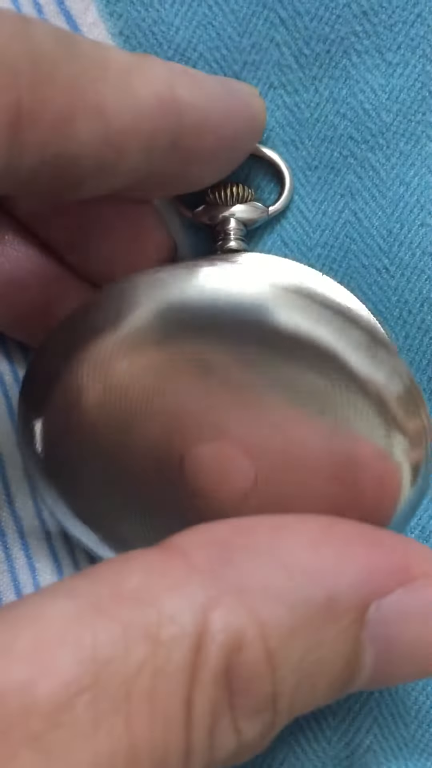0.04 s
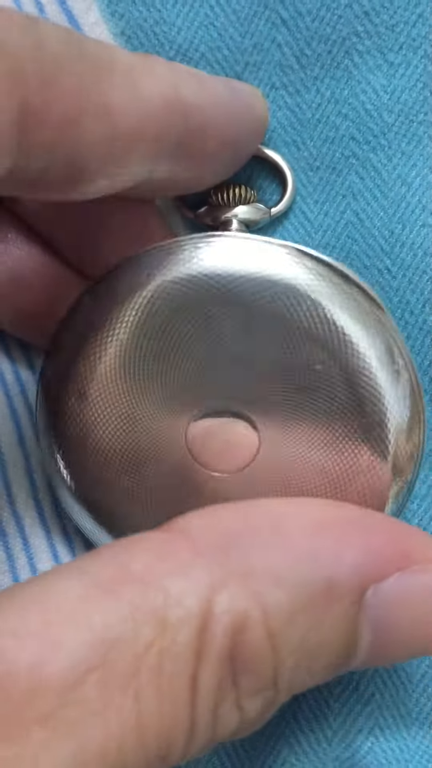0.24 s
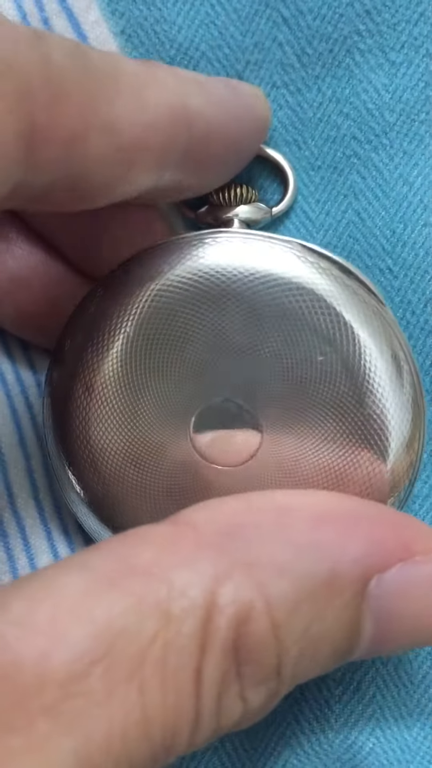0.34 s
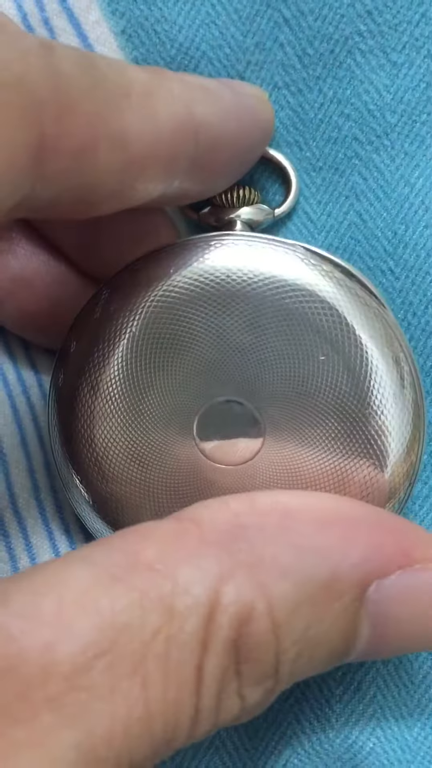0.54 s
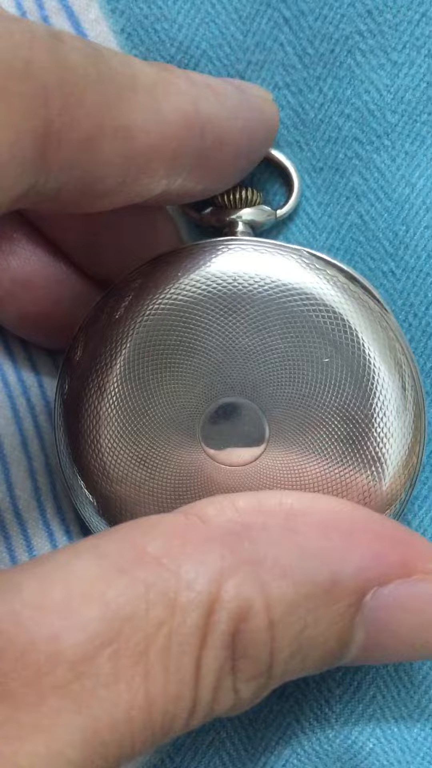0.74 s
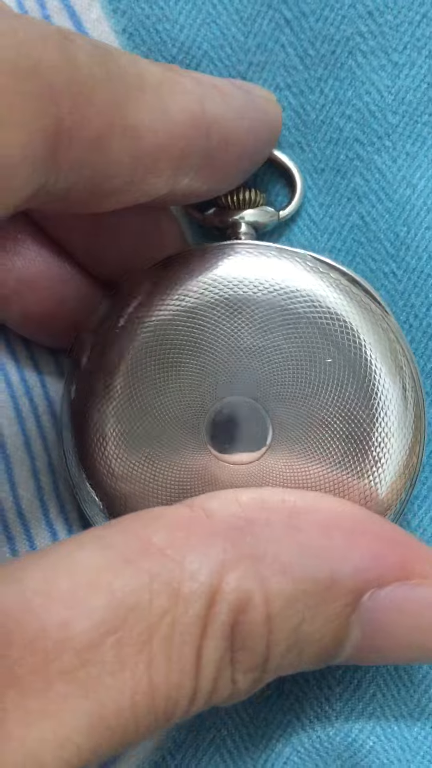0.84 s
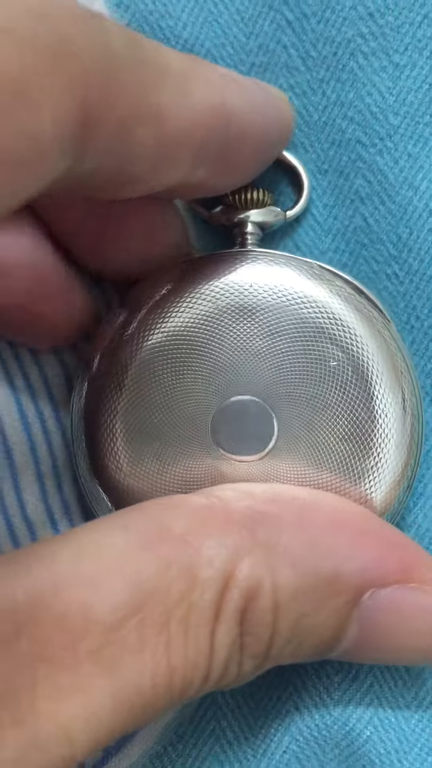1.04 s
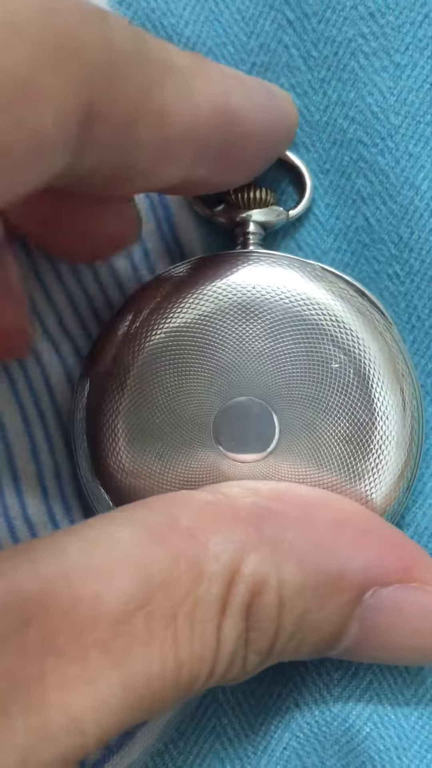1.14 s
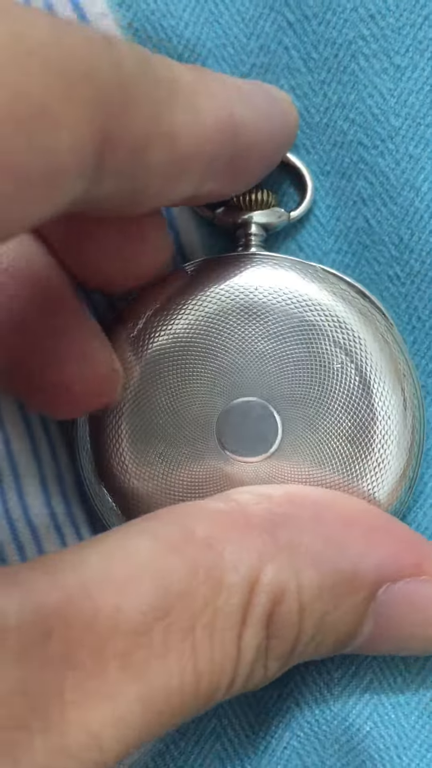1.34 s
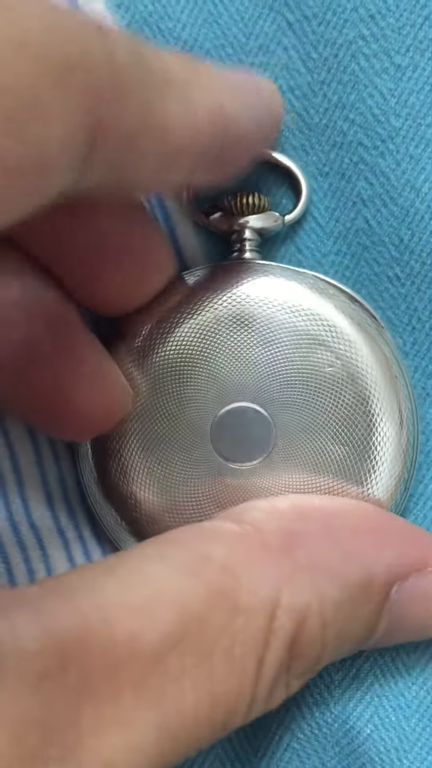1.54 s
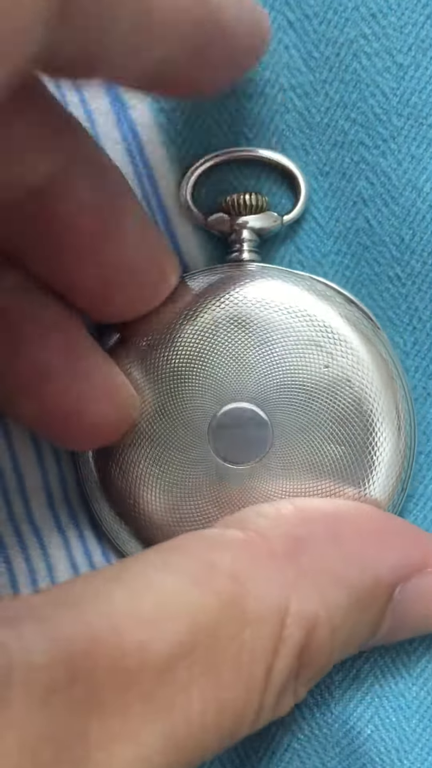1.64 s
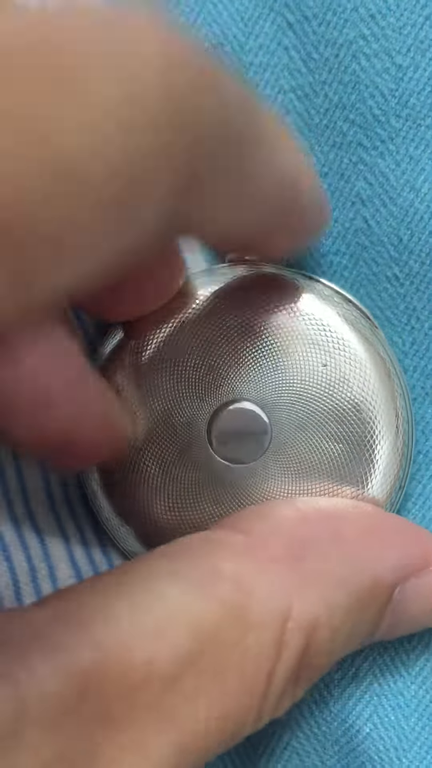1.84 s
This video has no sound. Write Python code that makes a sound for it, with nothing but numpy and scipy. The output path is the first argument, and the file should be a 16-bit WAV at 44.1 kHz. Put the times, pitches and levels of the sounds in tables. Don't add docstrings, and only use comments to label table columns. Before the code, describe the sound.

A pocket watch's metal back snaps shut with one sharp, bright click, then faint finger taps.

```python
import sys
import numpy as np
from scipy import signal
from scipy.fft import rfft, irfft
from scipy.io import wavfile

SR = 44100
rng = np.random.default_rng(int(sys.argv[2]) if len(sys.argv) > 2 else 0)


def store_pcm(level_fs):
    pcm = np.round(np.clip(level_fs, -1, 1) * 32767).astype(np.int16)
    wavfile.write(sys.argv[1], SR, np.atleast_2d(pcm).T)


def how_loud(loudness_db):
    steps = np.asarray(loudness_db, float) / 20
    return 10 ** steps


N = 83790


def rms_one(x):
    return x / np.sqrt(np.mean(x ** 2) + 1e-20)


def band_noise(noise, low_hz, high_hz):
    band = signal.butter(2, [low_hz, high_hz], "band", fs=SR, output="sos")
    return signal.sosfilt(band, noise)


def drift(rate_hz):
    hop, settle = 40, 2000
    pole = np.exp(-2 * np.pi * rate_hz * hop / SR)
    chance = rng.standard_normal(N // hop + settle + 2)
    slow = signal.lfilter([1], [1, -2 * pole, pole * pole], chance)[settle:]
    return np.interp(np.arange(N) / hop, np.arange(len(slow)), rms_one(slow))


def coloured(spectrum, patchy_db, rate_hz):
    hz = np.maximum(np.fft.rfftfreq(N, 1 / SR), 1)
    point_hz, point_db = np.transpose(spectrum)
    inside = (hz >= point_hz[0]) & (hz <= point_hz[-1])
    level_db = np.interp(np.log(hz), np.log(point_hz), point_db)
    noise = rfft(rng.standard_normal(N)) * how_loud(level_db) * inside
    half_octave = 2 * np.log2(hz)
    first, last = np.floor(half_octave[inside].min()), np.ceil(half_octave[inside].max())
    total = np.zeros(N)
    for centre in np.arange(first, last + 1):
        window = np.cos(np.pi / 2 * np.clip(half_octave - centre, -1, 1)) ** 2
        total += how_loud(patchy_db * drift(rate_hz)) * irfft(noise * window, N)
    return rms_one(total)


def strike(contacts, modes, scatter_db, crack_db):
    crack_t60_s, crack_low_hz = 0.0074, 900
    out, t = np.zeros(N + SR), np.arange(SR // 4) / SR
    hz, mode_db, t60_s = np.transpose(modes)[:, :, None]
    sign = (-1) ** np.arange(len(hz))[:, None]
    vibration = sign * how_loud(-60 * t / t60_s) * np.sin(2 * np.pi * hz * t)
    for start_s, db, top_hz, bottom_hz in contacts:
        reach = how_loud(mode_db + scatter_db * rng.standard_normal(hz.shape))
        reach = reach / (1 + (hz / top_hz) ** 5) / (1 + (bottom_hz / hz) ** 4)
        rings = (reach * vibration).sum(axis=0)
        burst = rng.standard_normal(len(t)) * how_loud(crack_db - 60 * t / crack_t60_s)
        crack = band_noise(burst, max(crack_low_hz, bottom_hz), min(crack_low_hz + top_hz, .45 * SR))
        first = int(start_s * SR)
        out[first:first + len(t)] += how_loud(db) * (rings + crack)
    return out[:N]


# (frequency [Hz], level [dB per Hz])
RUMBLE_SPECTRUM = [(15, -50.5), (25, -20), (41, -7.5), (64, -4.5), (167, -7.5), (195, -5), (226, -12.5),
                   (353, -21), (450, -29), (580, -63), (990, -120)]


def rumble():
    return how_loud(-61) * coloured(RUMBLE_SPECTRUM, patchy_db=2.5, rate_hz=6.0)


# (frequency [Hz], level [dB per Hz])
HISS_SPECTRUM = [(210, -30), (350, -4), (467, -11.5), (557, -8), (664, -13.5), (730, -10), (2100, -13.5),
                 (14300, -28.5), (16000, -26.5)]


def hiss():
    return how_loud(-69.5) * coloured(HISS_SPECTRUM, patchy_db=0.08, rate_hz=1.3)


# (time [s], level [dB], frequency [Hz], length [s])
LOW_SWELLS = [(0.033, -44.5, 59.5, 0.036), (0.021, -64, 350, 0.037), (0.19, -50, 58.4, 0.067),
              (0.319, -54, 190, 0.045), (.65, -65.5, 59.5, .05), (0.772, -49.5, 65, .04),
              (0.835, -51.5, 60, .06), (.91, -48.5, 60, .05), (1.06, -58.5, 195.3, .05),
              (1.089, -55, 60, 0.048), (1.18, -54, 139.1, 0.043), (1.254, -55.5, 191, 0.052),
              (1.391, -54.5, 61.3, 0.038), (1.502, -49.5, 100.6, 0.035), (1.526, -56, 195, 0.083),
              (1.654, -51, 84.1, .05), (1.807, -58, 59.9, .05)]


def swells():
    t, total = np.arange(N) / SR, np.zeros(N)
    for centre_s, db, hz, length_s in LOW_SWELLS:
        envelope = np.exp(-2 * ((t - centre_s) / length_s * 2) ** 2)
        total += how_loud(db) * envelope * np.sin(2 * np.pi * (hz * t + rng.random()))
    return total


# (frequency [Hz], level [dB], T60 [s])
ESCAPEMENT_MODES = [(8710, -5, 0.011), (11733, -8.5, 0.0067), (12570, -12, .006), (14800, -1, .007)]


def ticks():
    first_s, every_s, contact_gap_s = .0912, .2002, .0012
    shut_db, open_gain_db = -69.5, 5
    contacts = []
    for beat_s in np.arange(first_s, N / SR, every_s):
        db = shut_db + open_gain_db * (beat_s < LID_CONTACTS[0][0])
        for k in range(2):
            contacts.append((beat_s + k * contact_gap_s, db, 20000, 20))
    return strike(contacts, ESCAPEMENT_MODES, scatter_db=5, crack_db=-32)


def scrape():
    start_s, start_db, rise_db = .191, -60, 4
    along = (np.arange(N) / SR - start_s) / (LID_CONTACTS[1][0] - start_s)
    rub = rms_one(band_noise(rng.standard_normal(N), 800, 3800))
    return rub * how_loud(start_db + rise_db * np.clip(along, 0, 1)) * (along > 0) * (along < 1)


# (time [s], level [dB], contact top [Hz], contact bottom [Hz])
LID_CONTACTS = [
    (.1920, -61, 9000, 4500),
    (.2150, -12.5, 15000, 100),
    (.2358, -44, 15000, 5000),
    (.2372, -33.5, 5007, 3300),
    (.2390, -33.5, 5953, 3000),
    (.2415, -39.5, 2600, 900),
    (.2447, -38.5, 2800, 1200),
]
# (time [s], level [dB], contact top [Hz], contact bottom [Hz])
SEAT_CONTACTS = [
    (.2162, -15, 14200, 100),
    (.2175, -22, 6100, 99),
    (.2192, -15, 2360, 100),
]
# (frequency [Hz], level [dB], T60 [s])
LID_MODES = [(1159, -12, .038), (1485, -10.5, 0.075), (1823, -9.5, .03), (2165, -4.5, 0.033),
             (2737, -9, 0.032), (2813, -14.5, .04), (3206, -1, .02), (3880, -7, .075), (4335, -15, .05),
             (4614, -6.5, .03), (5290, -8, .03), (6710, -11.5, 0.032), (9035, -22, 0.043),
             (13650, -15, .03)]
# (frequency [Hz], level [dB], T60 [s])
BODY_MODES = [(200, -12, 0.029), (292, -15.5, 0.033), (500, -16.5, 0.021), (863.6, -18.5, 0.013),
              (1060, -17, 0.033), (1600, -6, 0.0052), (3886.6, 6, .004), (2521, -9.5, .015),
              (5120, -10, 0.017), (7700, -21, .03), (9900, -23, .022), (11110, -24.5, 0.017),
              (15060, -24, .024), (15810, -14, .012)]


def snap():
    press_s, press_db_per_s = .241, 1301
    lid = strike(LID_CONTACTS, LID_MODES + BODY_MODES, scatter_db=1, crack_db=-4.5)
    seat = strike(SEAT_CONTACTS, BODY_MODES, scatter_db=1, crack_db=-4.5)
    pressed_for = np.clip(np.arange(N) / SR - press_s, 0, .1)
    return (lid + seat) * how_loud(-press_db_per_s * pressed_for)


# (frequency [Hz], level [dB], T60 [s])
INNER_MODES = [(1540, -61, 0.51), (2050, -60.5, 0.68), (2700, -60, 0.36), (3300, -62.5, .4),
               (3820, -53, .5), (4400, -61.5, 0.35), (4861, -60, .4), (5399, -60.5, .4),
               (7060, -55.5, 0.36), (9362, -57.5, .2), (13700, -68.5, .2)]


def shiver():
    width_hz, hold_after_s, hold_db_per_s = 160, 0.13, 399
    since = np.arange(N) / SR - LID_CONTACTS[1][0]
    pole, total = np.exp(-np.pi * width_hz / SR), np.zeros(N)
    for hz, db, t60_s in INNER_MODES:
        resonance = [1, -2 * pole * np.cos(2 * np.pi * hz / SR), pole * pole]
        line = rms_one(signal.lfilter([1, 0, -1], resonance, rng.standard_normal(N)))
        total += how_loud(db - 60 * np.maximum(since, 0) / t60_s) * line
    return total * (since > 0) * how_loud(-hold_db_per_s * np.clip(since - hold_after_s, 0, .2))


def room(x):
    t60_s, high_t60_s, rise_s = 0.19, 0.22, 0.014
    t = np.arange(SR // 2) / SR
    low, high = rng.standard_normal((2, len(t))) * np.minimum(t / rise_s, 1)
    low = band_noise(low, 300, 5000) * how_loud(-60 * t / t60_s)
    high = signal.sosfilt(signal.butter(2, 5000, "high", fs=SR, output="sos"), high)
    tail = low + how_loud(-6) * high * how_loud(-60 * t / high_t60_s)
    return how_loud(-29.5) * signal.fftconvolve(x, tail / np.sqrt(np.sum(tail ** 2)))[:N]


# (time [s], level [dB], contact top [Hz], contact bottom [Hz])
TAP_CONTACTS = [(1.4022, -35.5, 12000, 500), (1.4075, -34, 2464, 900), (1.4165, -47.5, 1982, 300),
                (1.5448, -34.5, 1400, 980), (1.5461, -44.5, 600.5, 300), (1.5455, -60, 9000, 4000),
                (1.5850, -54, 2600, 2000), (1.5950, -41, 1800, 900), (1.6000, -60, 6000, 5000),
                (1.5960, -40.5, 442, 200), (1.5990, -44, 2200, 300), (1.6285, -51, 1600, 500),
                (1.6380, -59, 1320, 300), (1.6410, -53.5, 1310, 300), (1.6479, -48, 2000, 900),
                (1.6520, -56, 6000, 5000)]
# (frequency [Hz], level [dB], T60 [s])
HELD_MODES = [(350, -6, 0.029), (504, -4.5, 0.019), (1065, -4.5, 0.013), (1200, -2.5, 0.013),
              (1403, -5.5, 0.023), (1730, -2.5, 0.014), (2340, -1.5, 0.012), (3000, -15, .015),
              (3840, -11, 0.0073), (4625, 0.5, .011), (5290, 1, 0.018), (7200, -15.5, .01),
              (11200, -15, 0.0092), (13750, -29, .012)]


def taps():
    return strike(TAP_CONTACTS, HELD_MODES, scatter_db=2, crack_db=-10.5)


def scene():
    watch = snap() + scrape() + shiver() + taps() + ticks()
    background = rumble() + swells() + hiss()
    return (watch + room(watch) + background)[None]


def band_limit(x):
    return signal.sosfilt(signal.butter(12, 16570, fs=SR, output="sos"), x)


def record(dry):
    dip_hz, dip_width_hz, dip_share = 10500, 700, 0.26
    x = signal.sosfilt(signal.butter(4, 45, "high", fs=SR, output="sos"), dry)
    peak = signal.iirpeak(dip_hz, dip_hz / dip_width_hz, fs=SR)
    x = x - dip_share * signal.lfilter(*peak, x)
    x = signal.sosfilt(signal.cheby2(12, 60, 16600, fs=SR, output="sos"), x)
    return band_limit(x)


dry = scene()
out = record(dry)
store_pcm(out)
```